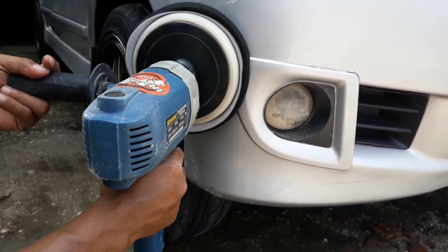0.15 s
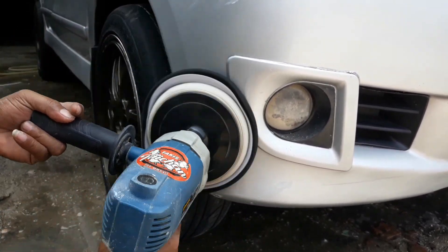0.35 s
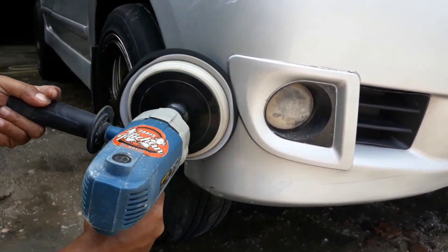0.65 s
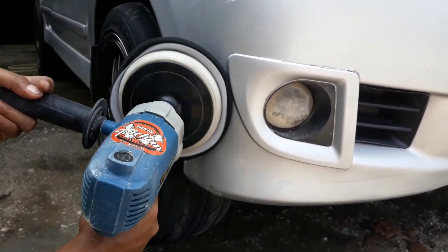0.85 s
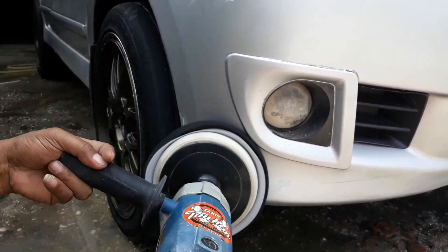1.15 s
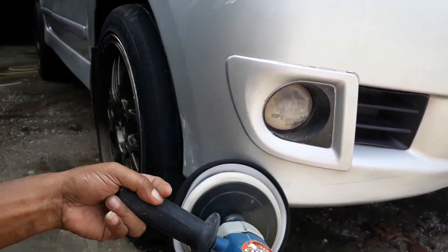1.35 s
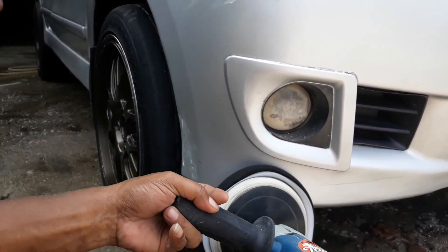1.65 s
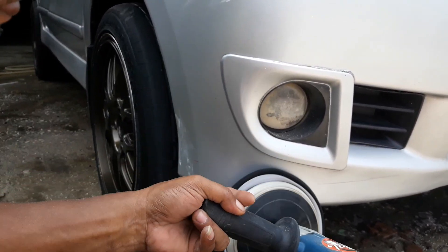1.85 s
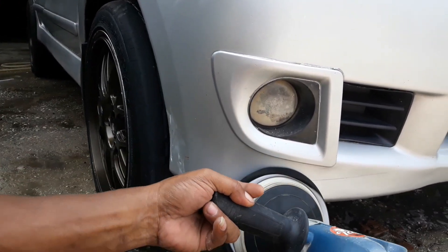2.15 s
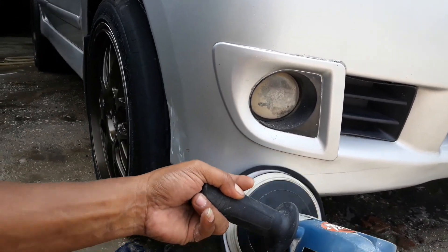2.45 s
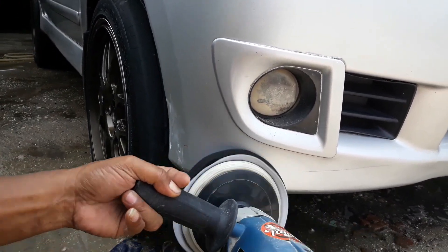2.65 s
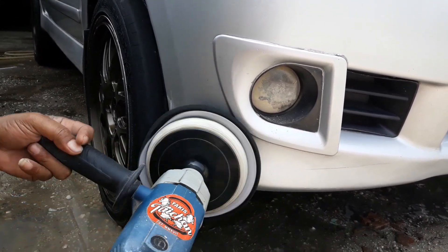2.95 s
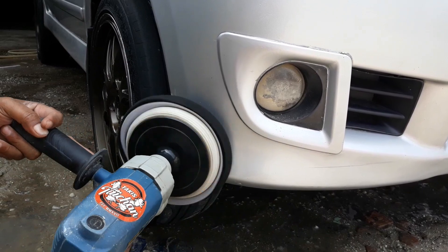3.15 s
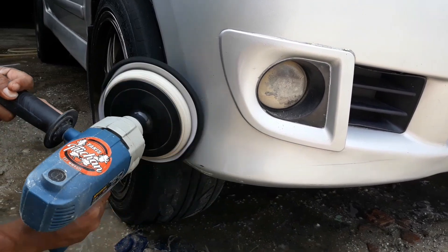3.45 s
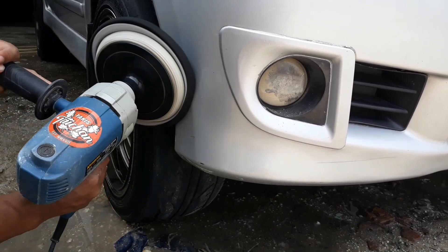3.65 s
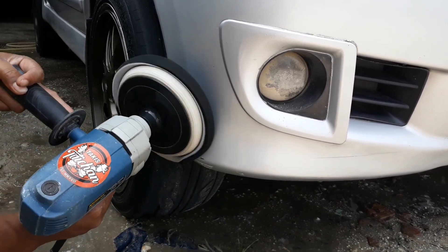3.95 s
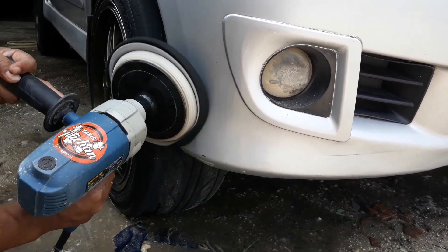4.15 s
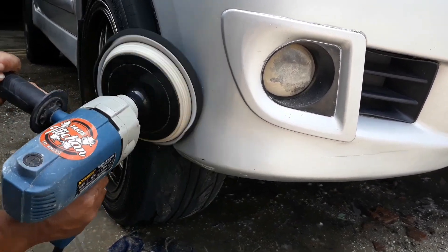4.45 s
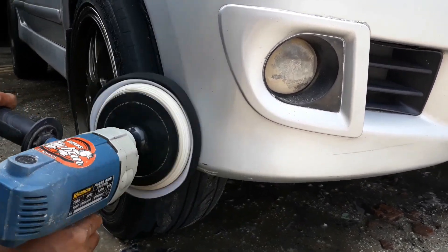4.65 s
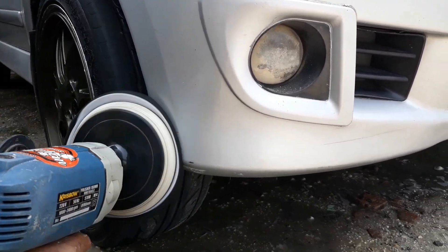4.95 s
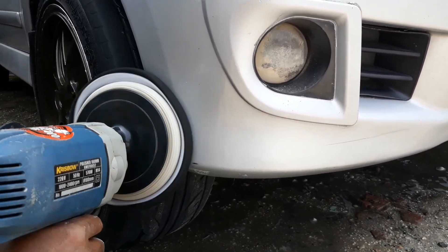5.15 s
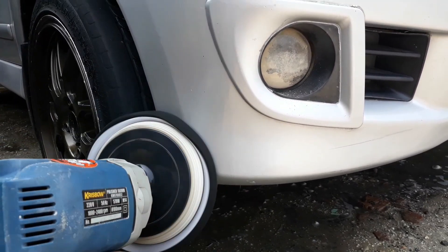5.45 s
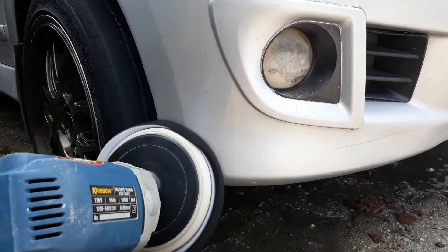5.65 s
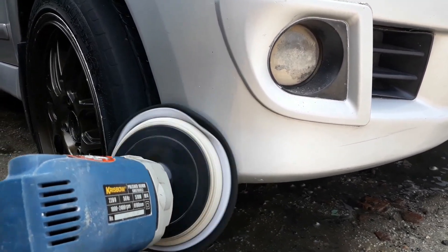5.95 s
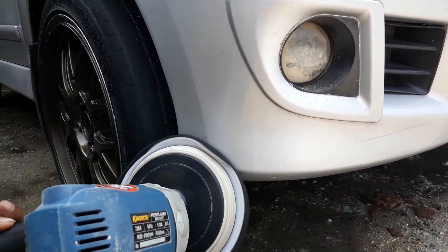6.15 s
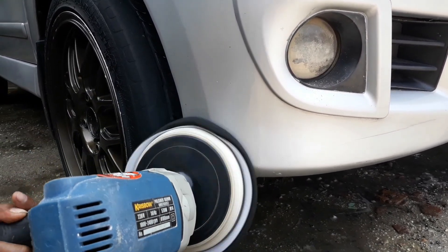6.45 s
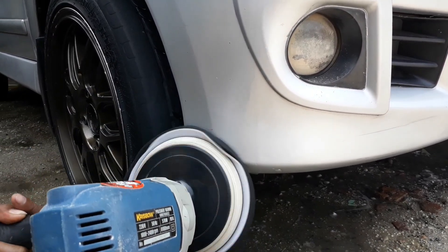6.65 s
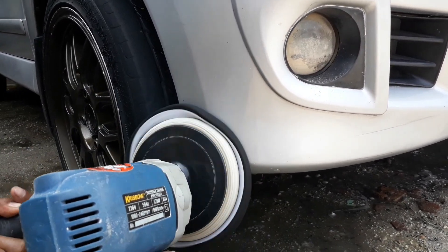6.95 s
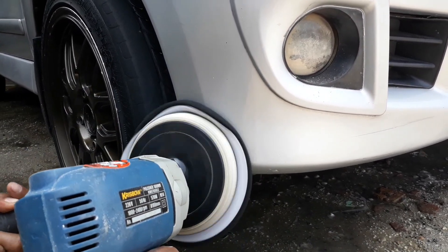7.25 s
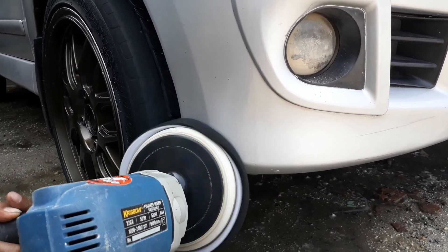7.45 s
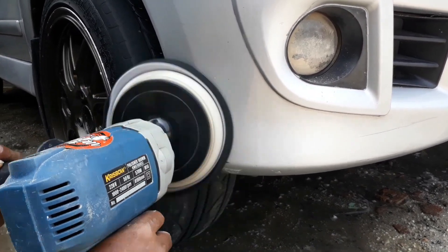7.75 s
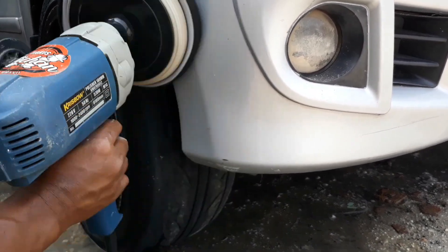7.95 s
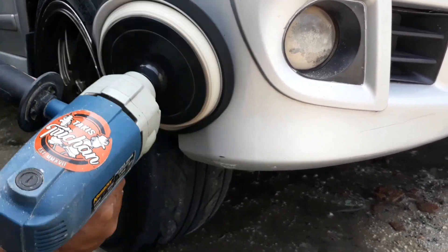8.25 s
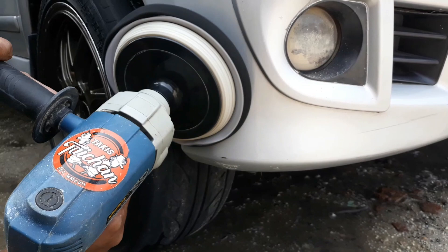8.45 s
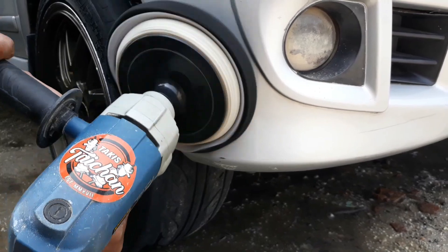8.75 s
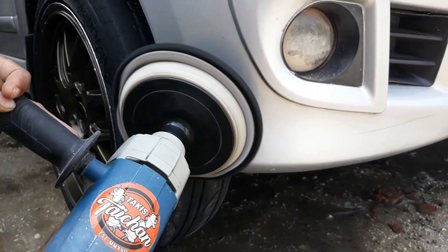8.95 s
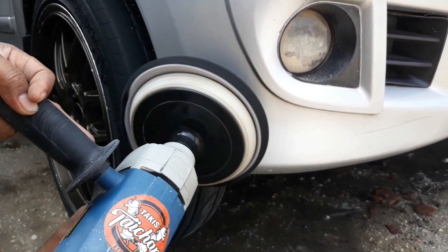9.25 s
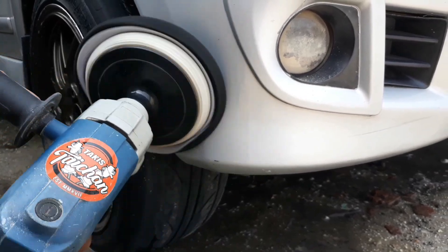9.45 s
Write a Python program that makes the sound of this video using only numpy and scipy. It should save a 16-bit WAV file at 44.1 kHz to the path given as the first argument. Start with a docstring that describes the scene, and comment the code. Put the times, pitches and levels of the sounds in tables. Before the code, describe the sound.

A handheld electric rotary polisher whines steadily at close range, its gritty geared pitch sagging and recovering as the foam pad works over a car bumper.

```python
"""Rotary polisher on a car bumper

A hand-held polisher buffs a bumper with a foam pad; its speed sags and recovers as it is pressed and moved.
The mains motor whines at its armature slots; an 11-tooth pinion sings and clatters on the wheel that turns the pad.
The fan rushes, the carbon brushes hiss and squeal, bearings add faint tones, the pad rubs and the panel drones."""
import sys
import numpy as np
from scipy import signal
from scipy.fft import rfft, irfft
from scipy.io import wavfile
from scipy.ndimage import uniform_filter1d, map_coordinates

SR = 44100
rng = np.random.default_rng(int(sys.argv[2]) if len(sys.argv) > 2 else 0)


def int16_out(signal):
    """Quantize to a 16-bit WAV file."""
    q = np.round(np.clip(np.atleast_2d(signal).T, -1, 1) * 32767)
    wavfile.write(sys.argv[1], SR, q.astype(np.int16))


N = 422919

PINION_TEETH, WHEEL_TEETH, SLOTS = 11, 45, 12
MAINS_PULSES_HZ = 99.6
BALL_PASSES_PER_TURN = 9.285
WORKING_TURNS_PER_S = 210
RELEASE_RATTLE_DB = 0.07  # per (turn per s) per s of speeding up
CUTOFF_HZ = 15800


def motor(rotor, mains):
    """Armature slots pass the poles; current pulses, two a mains cycle, chop the whine into a comb of lines."""
    # Slot whine level before trim. Each row: time in seconds, level in dB.
    slot_whine = [(0.0, -24.5), (1.1, -28), (1.8, -18.5), (2.45, -30), (2.65, -20.5), (3.8, -26.5),
                  (4.15, -21), (4.55, -21.5), (4.75, -19.5), (7.55, -30), (8.1, -17), (9.05, -27),
                  (9.59, -21.5)]
    slot_db = in_time(slot_whine)

    chopped = runout(mains, 0.57, 0.4, slip=0.37) * runout(2 * mains, 0.16, 0.28, slip=0.33)
    chopped = chopped * runout(rotor, 0.096, 0.44)
    first = whine(SLOTS * rotor, chopped, flutter_db=3.5, jitter_rad=0.14)
    first = through_case(first, hz=2560, width_hz=220, direct=0.49)
    octave = whine(2 * SLOTS * rotor, runout(mains, 1.0, 0.3), flutter_db=4.5, jitter_rad=0.45)
    return from_db(slot_db + 2.5) * first + from_db(0.42 * slot_db - 30) * octave


def gears(rotor, wheel, handling):
    """Tooth mesh and two harmonics, wobbling with each turn of the wheel and of the pinion."""
    # Tooth mesh level before trim. Each row: time in seconds, level in dB.
    mesh_level = [(0.0, -25), (1.05, -20.5), (1.45, -30), (1.85, -20.5), (2.55, -41), (3.3, -19),
                  (3.7, -14), (4.55, -26.5), (4.95, -25.5), (6.5, -26.5), (7.5, -40), (8.25, -29.5),
                  (9.59, -28.5)]
    # Second harmonic's level before trim. Each row: time in seconds, level in dB.
    octave_level = [(0.0, -25), (1.25, -21), (1.4, -17), (2.2, -37.5), (2.8, -20), (3.9, -32), (4.25, -32),
                    (4.4, -34), (6.15, -20), (8.2, -27.5), (8.4, -29), (8.9, -23), (9.59, -20)]
    # Third harmonic's law before trim: dB at working speed, dB per turn/s, facing share, press share, wander in dB.
    third_law = (-30.5, -0.1148, -0.45, 0.1, 3.5)

    mesh = PINION_TEETH * rotor
    wobble = runout(wheel, 0.3, 0.31) * runout(rotor, 0.04, -0.12)
    first = whine(mesh, wobble, flutter_db=2.0, jitter_rad=0.2)

    binding = tight_spot(wheel, depth_db=6.0, sharpness=5.7)
    binding = binding * runout(wheel, 0.05, 0.77) * runout(rotor, 0.54, -0.47)
    second = whine(2 * mesh, binding, flutter_db=1.5, jitter_rad=0.44)
    second = through_case(second, hz=4560, width_hz=960, direct=0.15)

    wobble = runout(wheel, 0.61, 0.79) * runout(rotor, 0.68, -0.35)
    third = whine(3 * mesh, wobble, flutter_db=3.0, jitter_rad=0.55)

    low = from_db(in_time(mesh_level) + 1.2) * first
    middle = from_db(in_time(octave_level) + 2.5) * second
    return low + middle + from_db(follow(third_law, handling) - 2.0) * third


def clatter(rotor, wheel, mains, handling):
    """The gear case rings: its main mode with each torque pulse, its higher ones at the wheel's tight spot."""
    # Gear case modes the teeth knock on. Each row: frequency in Hz, width in Hz, relative level in dB.
    case_modes = [(2956, 160, 3.5), (3606, 520, 0.5), (4570, 300, 0.5), (5970, 750, -5.5)]
    # Main ring's law before trim: dB at working speed, dB per turn/s, facing share, press share, wander in dB.
    ring_law = (-19.5, 0.2, 0.52, -1.55, -0.5)
    # Higher modes' law before release: dB at working speed, dB per turn/s, facing share, press share, wander in dB.
    clatter_law = (-21.5, -0.0658, 0.2, -0.5, 0.55)

    clicks = knocks(rotor, from_db(0.9 * drift(60)), spread_db=8.0, wheel_wear=0.59, pinion_wear=0.61)
    ring = resonate(resonate(clicks * throb(mains, 2.0), 2660, 370), 2620, 510)
    ring = rms_one(echoes(ring, gain=0.26))

    hard = clicks * tight_spot(wheel, depth_db=6.5, sharpness=2.9) * throb(2 * wheel, 0.58)
    case = 0
    for k, (hz, width_hz, db) in enumerate(case_modes):
        case = case + (-1) ** k * from_db(db) * resonate(hard, hz, width_hz)
    band = signal.butter(3, [2200, 7000], "band", fs=SR, output="sos")
    case = rms_one(echoes(signal.sosfilt(band, case), gain=0.23))

    clatter_db = follow(clatter_law, handling) + release_db(handling[0])
    return from_db(follow(ring_law, handling) - 2.5) * ring + from_db(clatter_db) * case


def knocks(rotor, force, spread_db, wheel_wear, pinion_wear):
    """Clicks at each tooth: part chance in the backlash, part wear that repeats with each turn of either gear."""
    passed = PINION_TEETH * rotor / (2 * np.pi)
    tooth = np.arange(1, int(passed[-1]) - 1)
    wheel_errors = rms_one(rng.standard_normal(WHEEL_TEETH))
    pinion_errors = rms_one(rng.standard_normal(PINION_TEETH))
    wear = wheel_wear * wheel_errors[tooth % WHEEL_TEETH] + pinion_wear * pinion_errors[tooth % PINION_TEETH]

    late, size, sign = rng.standard_normal((len(tooth), 3)).T
    on_time = np.interp(tooth, passed, np.arange(N))
    loose = np.clip(on_time + late * 0.00016 * SR, 0, N - 1)  # 0.16 ms spread
    chance = rms_one(from_db(spread_db * np.minimum(size, 2.4))) * np.sign(sign)

    clicks = np.zeros(N)
    clicks[np.round(on_time).astype(int)] = wear - wear.mean()
    clicks[loose.astype(int)] += chance
    return clicks * force


def release_db(speed, size=6000):
    """The teeth rattle more while the motor speeds up, as the load comes off them."""
    speeding_up = uniform_filter1d(np.gradient(speed) * SR, size)
    return RELEASE_RATTLE_DB * np.maximum(speeding_up, 0)


def cooling_air(wheel, handling):
    """The fan's rush and its whistle in the vent slots; their bright part pulses as the pad turns."""
    # Fan rush spectrum. Each row: frequency in Hz, density in dB per Hz.
    fan_spectrum = [(1200, -17), (2100, 1), (3000, 6.5), (4100, -2.5), (4800, 1), (5400, -1), (5900, 0),
                    (6700, 0.5), (7400, -3.5), (8100, -7.5), (8800, -14.5), (10000, -18.5), (11200, -17.5),
                    (16000, -30)]
    # Vent slot whistle spectrum. Each row: frequency in Hz, density in dB per Hz.
    vent_spectrum = [(7000, -29), (7800, -5), (8250, -5), (8460, 1.5), (8700, -15.5), (9400, -17),
                     (10500, -46)]
    # Rush law before trim: dB at working speed, dB per turn/s, facing share, press share, wander in dB.
    fan_law = (-22, 0.0366, -0.12, 0.13, -0.05)
    # Vent whistle's law: dB at working speed, dB per turn/s, facing share, press share, wander in dB.
    vent_law = (-34.5, -0.1, -0.3, 0.0, 1.1)

    rush = from_db(follow(fan_law, handling) + 3.0) * noise(fan_spectrum) * from_db(0.18 * drift(13))
    vent = from_db(follow(vent_law, handling)) * noise(vent_spectrum) * from_db(2.2 * drift(3.6))
    air = rush + vent
    dull = signal.sosfiltfilt(signal.butter(4, 4200, fs=SR, output="sos"), air)
    return dull + (air - dull) * rms_one(tight_spot(wheel, depth_db=3.0, sharpness=3.2))


def brushes(rotor, wheel, brush_db):
    """Carbon brushes scrape: high noise that throbs with the armature and the wheel."""
    # Brush hiss spectrum. Each row: frequency in Hz, density in dB per Hz.
    brush_spectrum = [(8000, -54), (10600, -20.5), (11700, -8), (12700, 1), (13700, 2.5), (14800, -1),
                      (16000, -12)]
    hiss = noise(brush_spectrum) * throb(wheel, 0.59) * throb(rotor, 0.6)
    return from_db(brush_db) * hiss * from_db(0.94 * drift(5))


def whistles():
    """Narrow, unsteady squeals of the brushes that do not follow the shaft."""
    # Brush squeals. Each row: start and end in seconds, start and end frequency in Hz, width in Hz, level in dB.
    squeals = [(1.25, 1.9, 11350, 11380, 50, -46), (3.3, 4.2, 11400, 11370, 40, -42),
               (4.55, 5.4, 12950, 12500, 170, -32), (6.5, 7.15, 14680, 14540, 70, -31)]
    out = 0
    for start, end, start_hz, end_hz, width_hz, db in squeals:
        hz = np.interp(np.arange(N) / SR, [start, end], [start_hz, end_hz]) + 0.5 * width_hz * drift(2)
        waver = drift(width_hz) + 1j * drift(width_hz)
        squeal = np.real(waver * np.exp(2j * np.pi * np.cumsum(hz) / SR))
        out = out + from_db(db) * swell(start, end) * rms_one(squeal)
    return out


def bearing(rotor, wheel, handling):
    """Balls roll past marks in the races, out of step with the shaft; lesser tones come and go."""
    # Lesser armature and bearing tones. Each row: start and end in seconds, cycles per armature turn, level in dB.
    faint_tones = [(1.15, 2.05, 24, -32), (1.2, 2.2, 14, -29), (1.2, 1.8, 26, -30), (3.0, 3.8, 26, -30),
                   (3.0, 5.4, 5.88, -40), (4.8, 7.2, 14, -28), (5.1, 6.6, 16.6, -28), (5.5, 7.1, 13, -27),
                   (5.7, 7.1, 24, -34), (6.55, 7.9, 2.54, -43)]
    # Ball tone's law before trim: dB at working speed, dB per turn/s, facing share, press share, wander in dB.
    ball_law = (-37, -0.02, -0.5, 0.23, 1.0)
    # Its octave's law before trim: dB at working speed, dB per turn/s, facing share, press share, wander in dB.
    octave_law = (-32.0, -0.24, -0.3, -1.3, 1.0)

    def order(angle):
        return whine(angle, 1, flutter_db=2.0, jitter_rad=0.61)

    balls = from_db(follow(ball_law, handling) - 1.0) * order(BALL_PASSES_PER_TURN * rotor)
    octave = from_db(follow(octave_law, handling) - 1.0) * order(2 * BALL_PASSES_PER_TURN * rotor)
    # a trembling shaft angle blurs high orders more than low ones
    trembling = rotor + 0.023 * drift(17) + 0.038 * np.sin(wheel)
    faint = 0
    for start, end, cycles, db in faint_tones:
        faint = faint + from_db(db) * swell(start, end) * order(cycles * trembling)
    return balls + octave + faint


def bumper(handling):
    """The foam pad rubs the paint and shakes the panel, whose modes drone, swelling as the pad travels."""
    # Bumper panel modes. Each row: frequency in Hz, width in Hz (of the first of two resonances), resting level in dB.
    panel_modes = [(95, 3.5, -51.5), (119.9, 4, -47.5), (180.5, 5.7, -52.5), (1009, 180, -40)]
    # Spots that stir one mode. Each row: start and end in seconds, approximate mode in Hz, rise in dB.
    stirred_spots = [(-0.2, 1.24, 95, 9), (1.2, 2.6, 95, 5), (-0.2, 1.6, 120, 2), (-0.2, 0.47, 181, 10.5),
                     (-0.2, 0.37, 1006, 8.5), (1.5, 2.9, 181, 12.5), (2.75, 4.2, 1006, 8),
                     (3.7, 4.5, 95, 6.5), (6.05, 6.85, 120, 8.5), (7.9, 8.75, 120, 9.5),
                     (8.2, 8.9, 1006, 8), (8.25, 8.7, 95, 11), (8.85, 9.65, 1006, 12),
                     (9.098, 9.6, 120, 11)]
    # Pad rub spectrum. Each row: frequency in Hz, density in dB per Hz.
    rub_spectrum = [(300, -17), (560, -9.5), (780, -1), (1000, -3.5), (1350, -2.5), (1750, 1), (2150, 0.5),
                    (2600, -3), (4000, -22.5)]
    # Panel rumble spectrum. Each row: frequency in Hz, density in dB per Hz.
    rumble_spectrum = [(20, -38), (40, -37), (62, -9), (100, -7.5), (145, -0.5), (200, 0.5), (250, 0.5),
                       (320, -4.5), (420, -5.5), (600, -7.5), (1200, -23.5)]
    # Rub law: dB at working speed, dB per turn/s, facing share, press share, wander in dB.
    rub_law = (-27, 0.0041, 0.05, 0.15, 0.85)
    # Rumble law: dB at working speed, dB per turn/s, facing share, press share, wander in dB.
    rumble_law = (-36, 0.0158, 0.2, 0.26, 0.66)

    rub = from_db(follow(rub_law, handling)) * noise(rub_spectrum) * from_db(0.51 * drift(4.8))
    rumble = from_db(follow(rumble_law, handling)) * noise(rumble_spectrum)
    drone = 0
    for hz, width_hz, db in panel_modes:
        rises = [(start, end, rise) for start, end, mode_hz, rise in stirred_spots
                 if np.isclose(mode_hz, hz, rtol=0.11)]
        shaken = rng.standard_normal(N + SR)  # the first second is run-in
        mode = resonate(resonate(shaken, hz, width_hz), hz, 2 * width_hz)[SR:]
        drone = drone + from_db(db + swells(rises)) * even(rms_one(mode))
    return drone + echoes(rub + rumble, gain=0.14)


def whine(angle, sidebands, flutter_db, jitter_rad):
    """A tone, scaled to rms 1, whose phase jitters; its level then flutters."""
    tone = np.real(sidebands * np.exp(1j * (angle + jitter_rad * drift(8.9))))
    return rms_one(tone) * from_db(flutter_db * drift(4.8))


def runout(angle, swell_depth, swing_rad, slip_rad=None, slip=0.98):
    """A shaft or torque uneven once a cycle swells a tone and swings its phase: sidebands."""
    angle = angle + slip * drift(1.23)
    return np.exp(swell_depth * np.cos(angle) + 1j * swing_rad * np.sin(angle))


def tight_spot(wheel, depth_db, sharpness):
    """Once a turn a few teeth of the wheel bind and let go suddenly, never twice alike."""
    lopsided = wheel + 0.8 * (1 - np.cos(wheel))
    bump = np.exp(sharpness * (np.cos(lopsided) - 1))
    return from_db(depth_db * (1 + 0.32 * drift(17)) * bump)


def through_case(tone, hz, width_hz, direct):
    """The case favours the sidebands that lie near its mode."""
    return even(resonate(tone, hz, width_hz) + direct * tone)


def throb(angle, depth_db):
    """A gain that swells once a cycle, rms 1."""
    return rms_one(from_db(depth_db * np.cos(angle)))


def follow(law, handling):
    """A level in dB that follows motor speed, tool angle and pressure, and wanders a little."""
    speed, facing_db, press_db = handling
    db, db_per_turn, facing_share, press_share, wander_db = law
    steered_db = db_per_turn * (speed - WORKING_TURNS_PER_S) + facing_share * facing_db + press_share * press_db
    return db + steered_db + wander_db * drift(3.1)


def echoes(x, gain, count=5):
    """Floor, wheel and bumper send back short echoes, whose delays wander as the tool moves."""
    n, out = np.arange(N), x
    for k, delay_s in enumerate(np.geomspace(0.0023, 0.017, count)):
        delay = delay_s * SR * (1 + 0.0359 * drift(0.254))
        out = out + (-1) ** k * gain * map_coordinates(x, [n - delay], order=3)
    return out / np.sqrt(1 + count * gain ** 2)


def noise(spectrum):
    """Noise with a given spectrum, rms 1 before it is cut to length."""
    hz, db = np.transpose(spectrum)
    bins_hz = np.maximum(np.fft.rfftfreq(10 * SR, 1 / SR), 1)
    gain = from_db(np.interp(np.log(bins_hz), np.log(hz), db))
    white = rng.standard_normal(2 * len(bins_hz) - 2)
    return rms_one(irfft(gain * rfft(white)))[:N]


def resonate(x, hz, width_hz):
    """One resonance, gain about 1 on top."""
    r = np.exp(-np.pi * width_hz / SR)
    zeros = np.array([1, 0, -1]) * (1 - r * r) / 2
    return signal.lfilter(zeros, [1, -2 * r * np.cos(2 * np.pi * hz / SR), r * r], x)


def drift(corner_hz):
    """Slow chance of spread 1: noise at SR / 40 twice through a one-pole low-pass, run in."""
    r = np.exp(-80 * np.pi * corner_hz / SR)
    sparse = rng.standard_normal(N // 40 + 2002)
    slow = signal.lfilter([1], [1, -2 * r, r * r], sparse)[2000:]
    return np.interp(np.arange(N) / 40, np.arange(len(slow)), rms_one(slow))


def swell(start_s, end_s, fade_s=0.12):
    """A gain that fades in and out."""
    t = np.arange(N) / SR
    return np.clip(np.minimum(t - start_s, end_s - t) / fade_s, 0, 1)


def swells(rows):
    """A level in dB that leaves 0 for each (start s, end s, dB)."""
    return sum(db * swell(start, end) for start, end, db in rows)


def in_time(rows):
    """A curve of (s, value) at every sample."""
    s, value = np.transpose(rows)
    return np.interp(np.arange(N) / SR, s, value)


def even(x, size=5000):
    """Hold the short-term rms at 1."""
    return x / np.sqrt(uniform_filter1d(x ** 2, size) + 1e-12)


def rms_one(x):
    """Scale to rms 1."""
    return x / np.sqrt(np.mean(np.abs(x) ** 2) + 1e-20)


def from_db(db):
    """Decibels to gain."""
    return 10 ** (np.asarray(db) / 20)


def scene():
    """Armature angle and mains drive most sources; speed, tool angle and pressure set many of the levels."""
    # Motor speed, sagging under load. Each row: time in seconds, armature turns per s.
    speed_curve = [(0.0, 206.0), (0.25, 214.05), (0.74, 211.05), (0.93, 218.9), (1.12, 216.8),
                   (1.44, 227.1), (1.9, 224.65), (2.22, 211.0), (2.66, 202.9), (2.9, 205.0), (3.08, 224.15),
                   (3.28, 231.5), (3.76, 235.35), (4.32, 211.85), (4.6, 207.15), (4.79, 211.4),
                   (5.37, 216.1), (5.48, 213.55), (5.69, 216.2), (5.88, 208.95), (6.09, 217.55),
                   (6.25, 210.9), (6.45, 212.95), (6.67, 201.85), (6.99, 203.7), (7.17, 195.6),
                   (7.64, 196.2), (7.92, 200.95), (8.13, 213.85), (8.25, 213.05), (8.54, 194.9),
                   (8.94, 191.75), (9.39, 212.85), (9.59, 205.75)]
    # Brush hiss, loudest when the motor's vents face the listener. Each row: time in seconds, level in dB.
    hiss_level = [(0.0, -17), (0.3, -19.5), (0.55, -26), (0.85, -22.5), (1.25, -26.66), (1.45, -24),
                  (1.9, -31), (5.05, -21.5), (9.45, -26), (9.59, -24)]
    # Leaning on the pad: teeth stay in contact, the case rings less. Each row: start and end in seconds, depth in dB.
    presses = [(0.3, 0.8, 2.5), (1.1, 1.65, 4), (2.02, 2.98, 8.5), (6.55, 7.8, 0.5), (8.2, 9.05, 2)]

    speed, brush_db = in_time(speed_curve), in_time(hiss_level)
    rotor = 2 * np.pi * np.cumsum(speed) / SR
    wheel = rotor * PINION_TEETH / WHEEL_TEETH
    mains = 2 * np.pi * MAINS_PULSES_HZ * np.arange(N) / SR
    facing_db = brush_db - brush_db.mean()
    handling = speed, facing_db, swells(presses)

    drive = motor(rotor, mains) + gears(rotor, wheel, handling) + clatter(rotor, wheel, mains, handling)
    hissing = echoes(cooling_air(wheel, handling) + brushes(rotor, wheel, brush_db), gain=0.22)
    return (drive + hissing + whistles() + bearing(rotor, wheel, handling) + bumper(handling))[None]


def record(dry):
    """The highest peaks are rounded; the deep bass and the top are cut."""
    rounded = dry / (1 + np.abs(dry / 0.9) ** 8) ** (1 / 8)
    thin = signal.sosfilt(signal.butter(3, 43, "high", fs=SR, output="sos"), rounded)
    return signal.sosfilt(signal.ellip(12, 0.1, 90, CUTOFF_HZ, fs=SR, output="sos"), thin)


dry = scene()
out = record(dry)
int16_out(out)
```